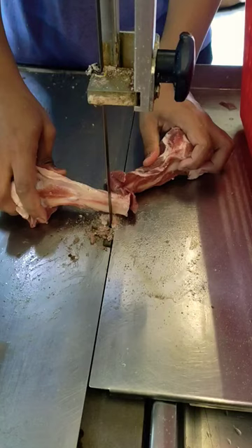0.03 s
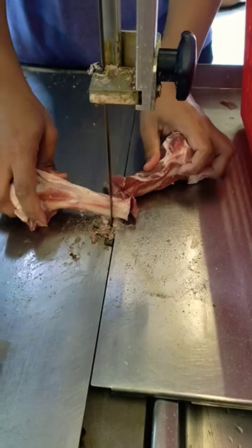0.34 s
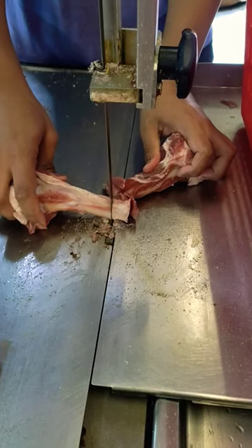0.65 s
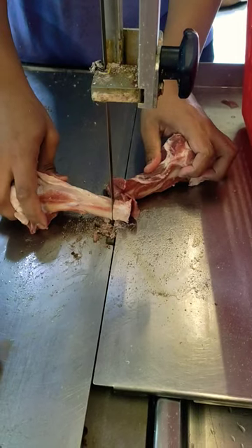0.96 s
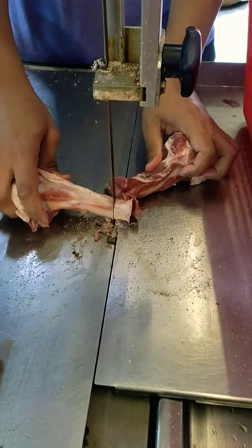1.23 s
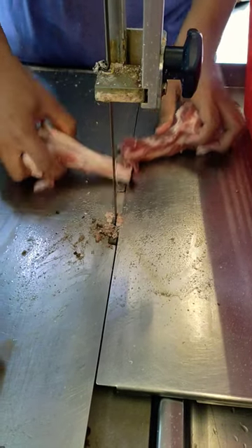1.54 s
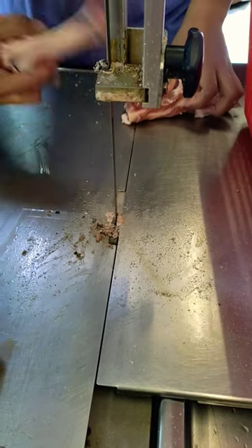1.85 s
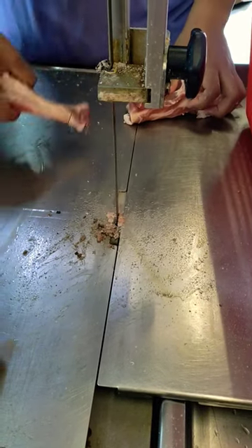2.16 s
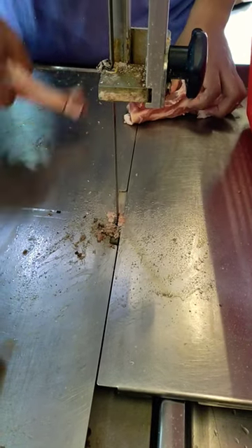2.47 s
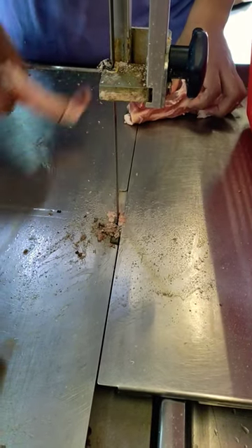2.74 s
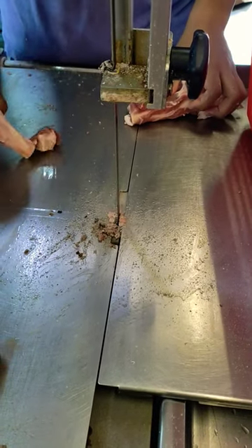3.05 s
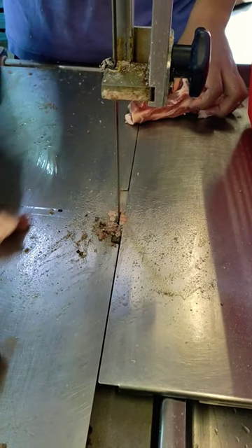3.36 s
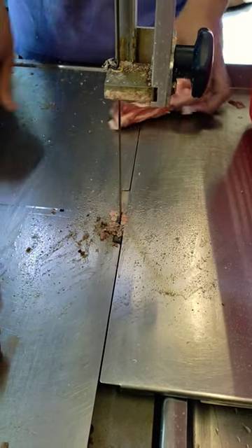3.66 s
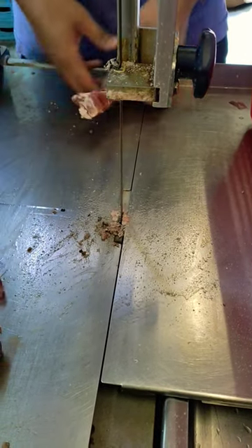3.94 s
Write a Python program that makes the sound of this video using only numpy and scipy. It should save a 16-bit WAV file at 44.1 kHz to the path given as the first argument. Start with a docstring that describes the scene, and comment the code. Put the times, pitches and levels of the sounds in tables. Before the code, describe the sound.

A band saw roars and rasps through bone, then the piece knocks on a steel table.

```python
"""Butcher's band saw, close up

The saw roars and its frame rings. Its teeth rasp and whine through a bone and squeal on the way out.
The blade runs free, rattling now and then, and the cut piece knocks and thuds on the steel table.
Gain control holds the machine down during the cut and ducks after the knocks."""
import sys
import numpy as np
from scipy import signal
from scipy.fft import rfft, irfft, next_fast_len
from scipy.io import wavfile
from scipy.ndimage import map_coordinates

SR = 44100
rng = np.random.default_rng(int(sys.argv[2]) if len(sys.argv) > 2 else 0)


def persist_wave(psi):
    """Save psi, clipped to +-1, as 16-bit WAV."""
    counts = np.round(np.clip(psi, -1, 1) * 32767).astype(np.int16)
    wavfile.write(sys.argv[1], SR, np.atleast_2d(counts).T)


N = 176400
TIME = np.arange(N) / SR
CUT_DB = 8  # gain shared by the cut and its squeal


def amp(db):
    """Decibels to gain."""
    return 10 ** (np.asarray(db) / 20)


def unit(x):
    """Scale to rms 1."""
    return x / np.sqrt(np.mean(x ** 2) + 1e-20)


def along(points, hz):
    """Read each column after the first at hz, on a log frequency axis."""
    freqs, *columns = np.transpose(points)
    return np.array([np.interp(np.log(hz + 1), np.log(freqs + 1), c) for c in columns])


def wobble(rate):
    """A smooth random curve with rate knots a second."""
    return map_coordinates(rng.standard_normal(N // 16), [TIME * rate], mode="wrap")


def filtered(x, response):
    """Equalise x with a gain that is a function of frequency."""
    size = next_fast_len(N + SR // 2)
    return irfft(rfft(x, size) * response(np.fft.rfftfreq(size, 1 / SR)), size)[..., :N]


def below(x, edge_hz, order=6):
    """A smooth low-pass."""
    return filtered(x, lambda hz: 1 / (1 + (hz / edge_hz) ** order))


def mid_side(coherence, hz):
    """Mid and side gains that make the two ears as alike as the coherence curve asks."""
    angle = np.arccos(np.clip(along(coherence, hz)[0], -1, 1)) / 2
    return np.array([np.cos(angle), np.sin(angle)])


def housing_noise(spectrum, coherence, ripple_db=4, ripple_width_hz=45):
    """Stereo noise that the steel housing colours with narrow peaks and dips above the bass."""
    mid, side = filtered(rng.standard_normal((2, N)), lambda hz: mid_side(coherence, hz))
    knots = rng.standard_normal((2, N // 64))

    def colour(hz):
        depth_db = ripple_db * hz / (hz + 500)
        ripple = [unit(amp(depth_db * map_coordinates(k, [hz / ripple_width_hz]))) for k in knots]
        return amp(along(spectrum, hz)) * np.array(ripple)

    return filtered(np.array([mid + side, mid - side]), colour) * np.sqrt(SR / 2)


def resonance(hz, width_hz):
    """A constantly excited ring at rms 1."""
    excitation = wobble(width_hz * 2) + 1j * wobble(width_hz * 2)
    return unit(np.real(excitation * np.exp(2j * np.pi * hz * TIME)))


def machine():
    """The running blade roars, flutters a little and keeps the frame ringing."""
    # noise spectrum of the free-running saw: freq_hz, left_db, right_db
    roar = [(30, -77.5, -76.5), (70, -62, -65), (97.4, -50, -51.5), (247, -49, -48.5), (496, -51, -45.5),
            (770, -51.5, -54.5), (960, -54, -46.5), (1340, -53, -53), (1830, -50.5, -47.5),
            (2480, -53.5, -49.5), (3770, -54, -54), (4600, -56, -53.5), (4900, -58, -60.5),
            (5770, -65.5, -62), (6120, -55.5, -53.5), (6270, -64.5, -61.5), (6750, -54, -60.5),
            (7000, -66.5, -72), (7580, -69, -58), (7900, -67, -83), (8500, -70.5, -59), (8900, -61.5, -78),
            (11060, -58.5, -64), (12050, -52.5, -73), (12800, -57, -74), (13300, -60, -71)]
    # likeness of the two ears: freq_hz, coherence
    coherence = [(60, 0.93), (230, 1), (460, 0.23), (900, 0)]
    # resonances of frame, wheels and blade: pitch_hz, level_db, width_hz
    frame_modes = [(110.7, -38, 25), (205.7, -34, 27), (259.6, -29, 8), (319, -39.5, 14), (398.3, -30, 14),
                   (488.4, -35.5, 9.3), (559, -37.5, 12), (668, -35, 20), (958, -29.5, 18),
                   (1010, -31.5, 12), (1652, -30.5, 11), (2000, -39, 9), (2445, -30, 13), (2540, -36, 28),
                   (2720, -32.5, 76)]
    out = housing_noise(roar, coherence) * amp(0.55 * wobble(20.97) + 1.1 * wobble(120))
    for hz, db, width_hz in frame_modes:
        mid_gain, side_gain = mid_side(coherence, hz)
        mid = mid_gain * resonance(hz, width_hz)
        side = side_gain * resonance(hz, width_hz)
        out += amp(db) * np.array([mid + side, mid - side])
    return amp(-0.47) * out


def tooth_phase(jitter, tooth_hz=994, drift=0.00076):
    """The teeth pass at a nearly steady rate, with slow drift and fast jitter."""
    return 2 * np.pi * np.cumsum(tooth_hz * (1 + drift * wobble(8) + jitter * wobble(200))) / SR


def partial(phase, left_db, right_db, smear_rad, flutter_db=3.5):
    """One fluttering tone of the teeth, roughened separately in each ear."""
    ears = []
    for db in (left_db, right_db):
        flutter = amp(flutter_db * wobble(40))
        tone = np.sin(phase + wobble(27) + smear_rad * wobble(320))
        ears.append(amp(db) * unit(flutter * tone))
    return np.array(ears)


def cut(bass_edge_hz=1630, treble_edge_hz=8800, chip_db=1.8, surge_db=0.9, tooth_depth=0.097):
    """Each tooth tears off a chip: a rough rasp pulsing at the tooth rate, with a whine above it."""
    # three-band envelope of the bite: time_s, bass_db, middle_db, treble_db
    bite = [(0.4, -10, -5, -3), (0.47, -1.5, -0.5, -2), (0.6, 9, 2.5, -3), (0.73, 1, 4, 3),
            (0.85, 5.5, 4.5, 1.5), (1.05, 1.1, 3, 2.2), (1.25, -3.5, 0, 3), (1.45, -13, -2, 4),
            (1.54, -29, -3, 1.2), (1.6, -9, -4, 2), (1.655, 4.6, 3, 0.5), (1.71, -1.1, 2, 2.3),
            (1.77, -23, -5, -7), (1.85, -36, -8.5, -19), (1.95, -41, -16, -28)]
    # noise spectrum of teeth tearing bone: freq_hz, left_db, right_db
    rasp_spectrum = [(40, -74, -86), (119, -53, -84), (350, -51.5, -63), (1190, -53.5, -61.2),
                     (2070, -54, -53), (3100, -52.5, -52), (3600, -56.5, -56), (4460, -54.5, -53.5),
                     (5770, -61.5, -60), (5830, -58, -53.5), (6900, -59, -53.5), (7200, -61, -57),
                     (7220, -61, -52.5), (8070, -63, -52.5), (8500, -61.5, -60.5), (10100, -60, -60.5),
                     (11360, -57.5, -64.5), (11950, -48.5, -61), (12500, -53.5, -62.5), (13300, -54.5, -61)]
    # whine of the teeth: tooth_rate_multiple, left_db, right_db
    whine_partials = [(2, -39, -35), (3, -45, -41), (4, -43, -39), (5, -45, -40), (6, -46, -43),
                      (7.53, -49, -41), (8, -47, -39), (10, -49, -49), (12, -39, -49), (13, -41, -49)]
    times, *bands_db = np.transpose(bite)
    bass_gain, middle_gain, treble_gain = [amp(np.interp(TIME, times, db)) for db in bands_db]
    phase = tooth_phase(jitter=0.00217)
    rasp = housing_noise(rasp_spectrum, coherence=[(100, 0.098), (900, 0.0076)])
    bass, body = below(rasp, bass_edge_hz), below(rasp, treble_edge_hz)
    roughness = amp(chip_db * wobble(350) + surge_db * wobble(45))
    chips = unit(roughness * (1 + tooth_depth * np.cos(phase)))
    tearing = chips * (bass_gain * bass + middle_gain * (body - bass))
    hiss = treble_gain * (rasp - body)
    whine = sum(partial(k * phase, left, right, smear_rad=0.13) for k, left, right in whine_partials)
    return amp(CUT_DB) * (tearing + hiss + middle_gain * whine)


def rattle(chatter_db=3.5):
    """The blade chatters against its guide and rings in short swells, right of centre."""
    # rings of the blade: peak_s, half_length_s, level_db, pitch_hz, width_hz
    swells = [(.85, .12, -25, 1990, 55), (2.09, .03, -22, 2660, 50), (2.18, .04, -24, 2560, 50),
              (2.5, .065, -19, 2570, 70), (3.26, .04, -29, 2560, 40), (3.53, .05, -27, 2600, 90)]
    chatter = amp(chatter_db * wobble(130))
    out = np.zeros((2, N))
    for peak_s, half_s, db, hz, width_hz in swells:
        swell = amp(db) * np.exp(-((TIME - peak_s) / half_s) ** 2)
        out += swell * np.array([unit(chatter * resonance(hz, width_hz)) for _ in range(2)])
    return amp([[-3], [2]]) * out


def squeal(half_length_s=0.038):
    """A short, rough screech passes from partial to partial as the blade breaks out of the bone."""
    # partials of the screech: tooth_rate_multiple, peak_s, left_db, right_db
    partials = [(2, 1.62, -35, -33), (4, 1.595, -28, -21), (5, 1.615, -28, -26), (6, 1.635, -29, -21),
                (7, 1.63, -33, -26), (8, 1.593, -28, -23), (10, 1.595, -27, -34), (11, 1.6, -27, -33),
                (12, 1.608, -13, -29), (13, 1.59, -23, -35), (14, 1.6, -27, -38)]
    phase = tooth_phase(jitter=0.005)
    out = np.zeros((2, N))
    for k, peak_s, left_db, right_db in partials:
        swell = np.exp(-((TIME - peak_s) / half_length_s) ** 4)
        out += swell * partial(k * phase, left_db, right_db, smear_rad=0.75)
    return amp(CUT_DB) * out


def knocks(onset_s=0.0018, buzz_db=2.5, crack_db=-12, crack_t60_s=0.03):
    """Bone lands with a crack and a clack and sets the steel table buzzing; meat only thuds."""
    # bone meeting the table: start_s, ring_db, clack_db, clack_t60_s
    hits = [(2.235, -24, 2, 0.049), (2.237, -9, -3, 0.2), (2.6517, -13, -14, 0.21),
            (2.658, -5.5, -1.5, 0.23), (2.671, -2.5, -8.5, 0.31), (2.684, -5, -8.5, 0.56)]
    # modes of the steel table: pitch_hz, level_db, t60_s
    table_modes = [(155, -17, 0.15), (261, -11, 0.28), (307, -18, 0.22), (384, -12.5, 0.69),
                   (404, 2, 0.071), (555, -9.5, 0.29), (672.6, -4.5, 0.22), (715, -10, 0.18),
                   (990, -19, .2), (1190, -5.5, 0.12), (1840, -22, .1), (2070, -16, 0.35)]
    # noise spectrum of the clack: freq_hz, level_db
    clack_spectrum = [(40, -32), (150, -11), (400, 3), (1200, 5.5), (2100, 9.5), (3200, 0), (7000, -1.5),
                      (11000, -16), (14000, -31)]
    # the weight of the meat landing softly: start_s, level_db, pitch_hz, t60_s
    thuds = [(2.258, -5, 344, 0.072), (2.651, -21, 45, 0.046), (3.087, 3, 290, 0.034),
             (3.101, -5.5, 389, 0.15), (3.103, -5.5, 218, 0.065), (3.695, -10, 158, 0.1),
             (3.695, -11, 244, 0.063)]
    length = SR // 2
    t = TIME[:length]
    onset = 1 - np.exp(-t / onset_s)
    out = np.zeros((2, N + SR))
    for start_s, ring_db, clack_db, clack_t60_s in hits:
        ring = np.zeros((2, length))
        for hz, db, t60_s in table_modes:
            decay = amp(db + rng.normal(0, 1.1, (2, 1)) - 60 * t / t60_s)
            ear_phase = rng.normal(0, 1, (2, 1)) * hz / 900  # higher modes spread wider
            ring += decay * np.sin(2 * np.pi * hz * t + ear_phase)
        ring *= onset * amp(ring_db + buzz_db * wobble(110)[:length])
        noise = unit(filtered(rng.standard_normal((2, N)), lambda hz: amp(along(clack_spectrum, hz))))
        clack = amp(clack_db - 60 * t / clack_t60_s) * noise[:, :length]
        crack = amp(clack_db + crack_db - 60 * t / crack_t60_s) * rng.standard_normal((2, length))
        out[:, round(start_s * SR):][:, :length] += ring + clack + crack
    for start_s, db, hz, t60_s in thuds:
        thud = onset * amp(db - 60 * t / t60_s) * np.sin(2 * np.pi * hz * t)
        out[:, round(start_s * SR):][:, :length] += thud
    return out[:, :N] * amp([[-1.2], [1.2]])


def scene():
    """The running saw under its cut, squeal and rattles, and the piece landing."""
    return machine() + cut() + squeal() + rattle() + knocks()


def reduction(x, limit_db, slope, release_db_per_s, attack_s=0.025):
    """Gain reduction in dB: follows the smoothed level over a limit and lets go at a steady rate."""
    pole = np.exp(-1 / (attack_s * SR))
    power = signal.lfilter([1 - pole], [1, -pole], np.mean(x ** 2, axis=0))
    over_db = np.maximum(10 * np.log10(power + 1e-12) - limit_db, 0)
    ramp = release_db_per_s * TIME
    return np.maximum.accumulate(slope * over_db + ramp) - ramp


def record(dry, ceiling=0.95, start_s=0.392, pop_db=-14.5, pop_s=0.002, top_hz=14340):
    """Gain control, a treble duck after loud low sounds and rounded peaks; it all opens on a soft pop."""
    held = dry * amp(-reduction(dry, limit_db=-14.5, slope=0.8, release_db_per_s=55))
    low, key = below(held, edge_hz=4200, order=4), below(held, edge_hz=3000)
    duck_db = np.minimum(reduction(key, limit_db=-15.2, slope=2.4, release_db_per_s=65), 7)
    ducked = low + (held - low) * amp(-duck_db)
    rounded = ducked / (1 + (ducked / ceiling) ** 8) ** (1 / 8)
    since_start = TIME - start_s
    pop = -amp(pop_db) * np.sign(since_start) * np.exp(-np.abs(since_start) / pop_s)
    return filtered(rounded * (since_start > 0) + pop, lambda hz: np.clip((top_hz - hz) / 120, 0, 1))


dry = scene()
out = record(dry)
persist_wave(out)
```